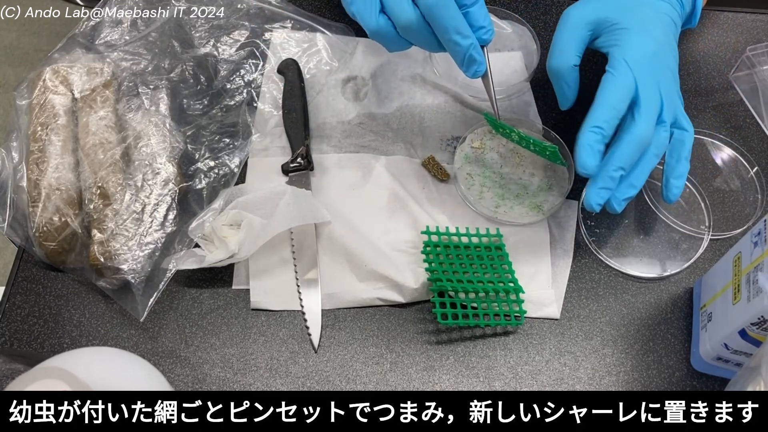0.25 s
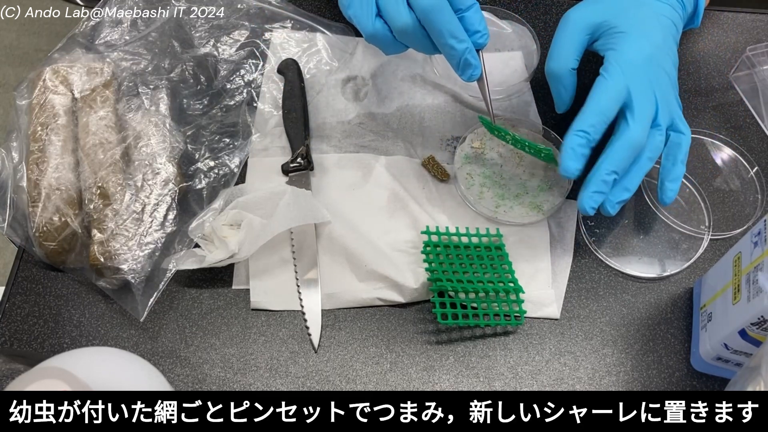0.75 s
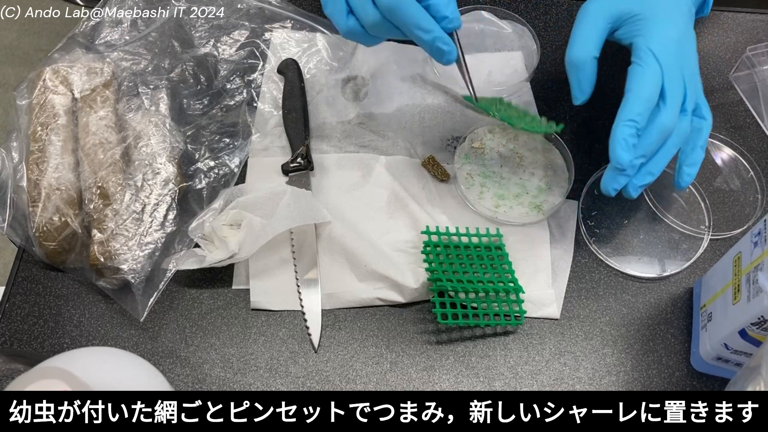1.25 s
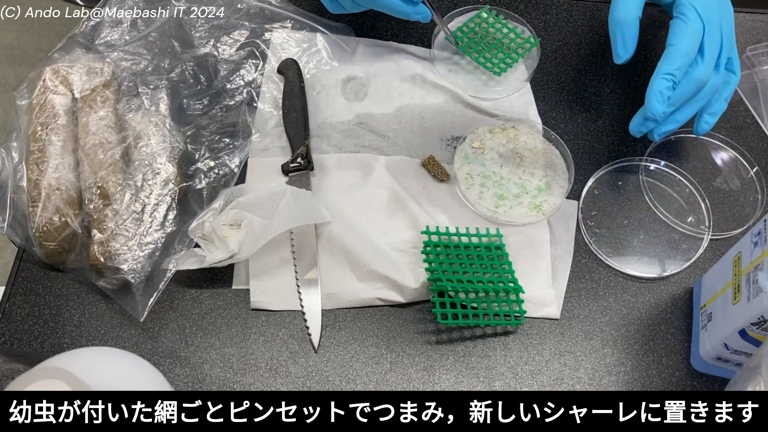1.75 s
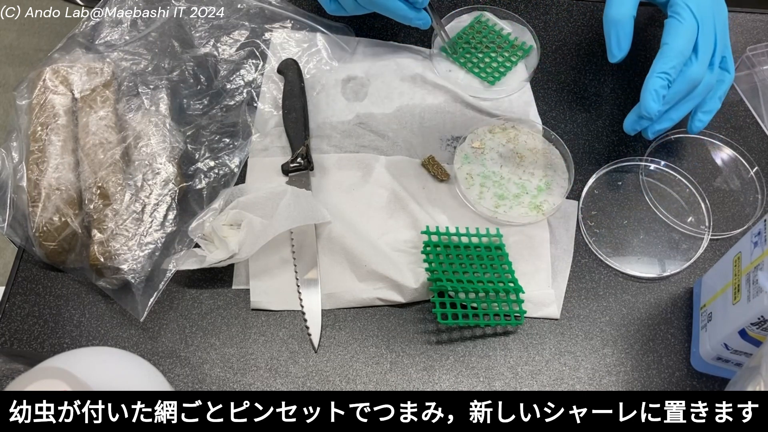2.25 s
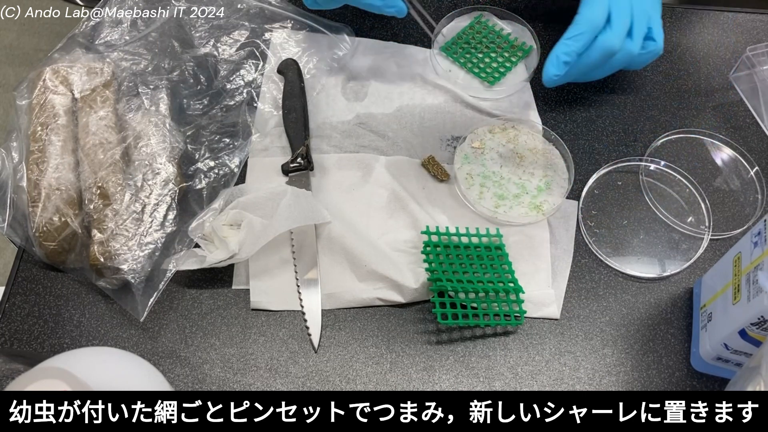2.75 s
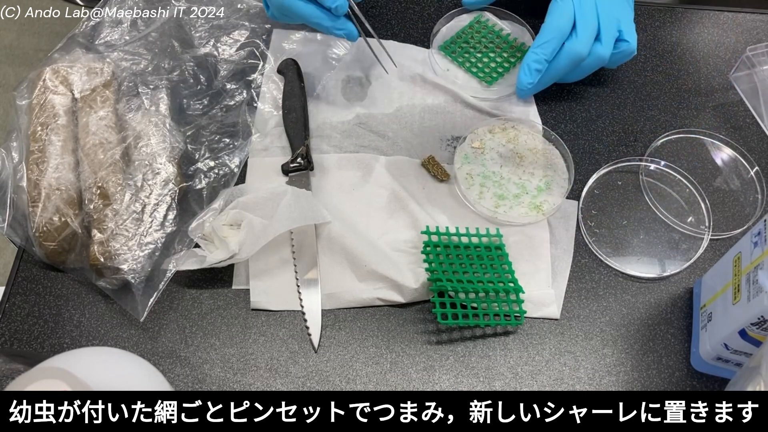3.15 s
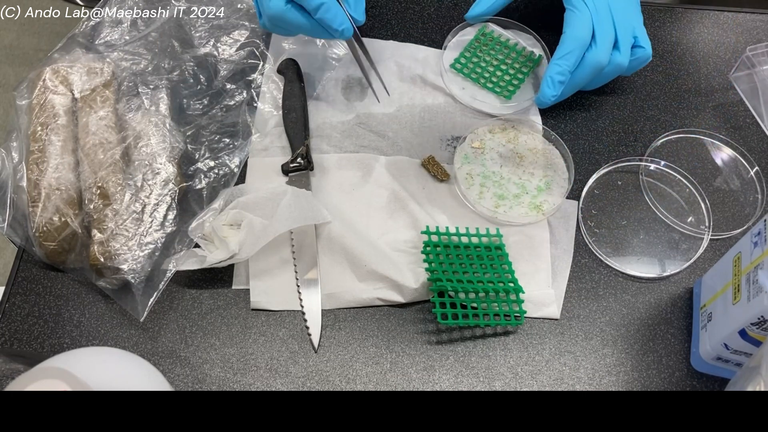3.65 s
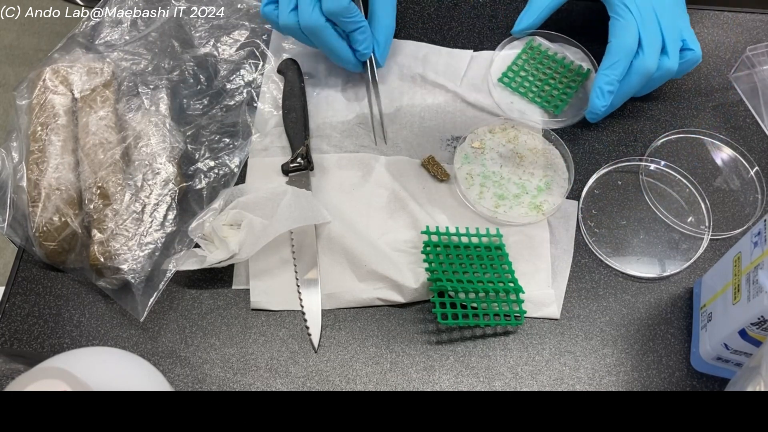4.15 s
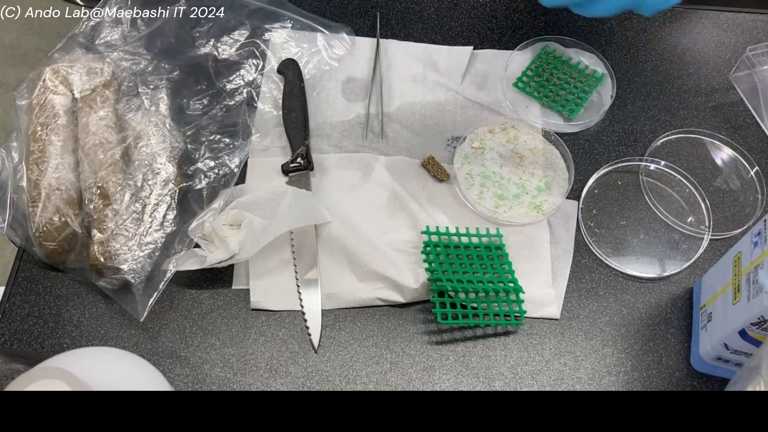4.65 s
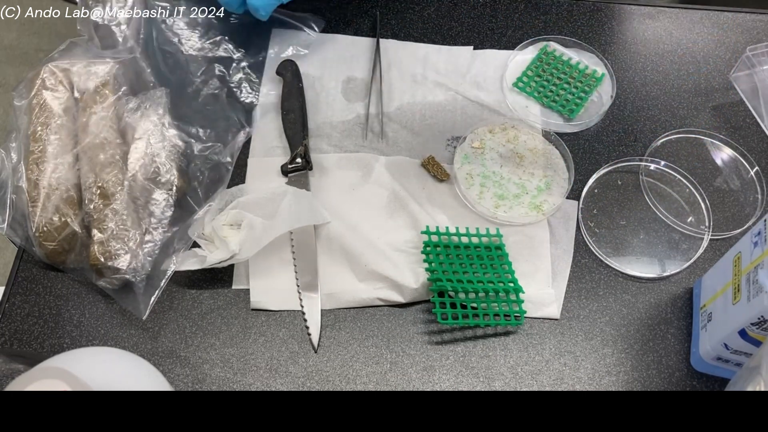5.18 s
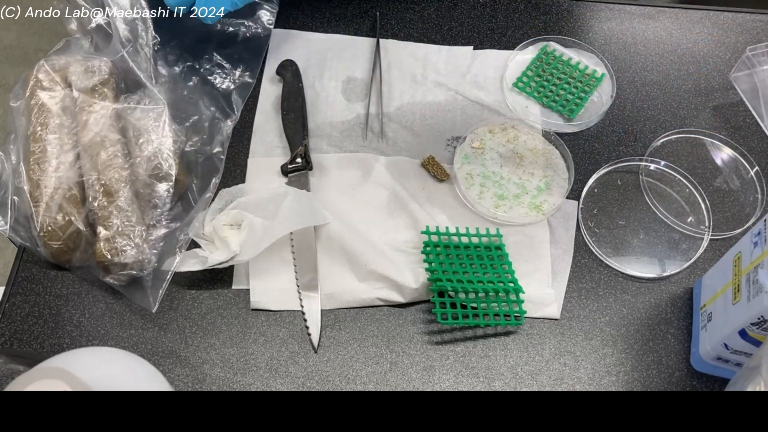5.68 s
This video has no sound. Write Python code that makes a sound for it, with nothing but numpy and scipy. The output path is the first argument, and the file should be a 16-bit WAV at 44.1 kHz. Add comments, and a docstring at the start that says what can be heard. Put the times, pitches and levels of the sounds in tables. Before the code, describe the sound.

Laboratory fans hum low and steady with soft airy hiss throughout. After a long quiet stretch a plastic dish scrapes faintly, steel tweezers hit the bench with one bright, hard clack, and then a gloved hand crumples a plastic bag in crackly bursts. Close stereo microphone above the bench, short room reflections.

```python
"""A laboratory bench under steady ventilation, heard by a small stereo microphone close above it.
A dish scrapes softly, steel tweezers are put down with a sharp clack, then a gloved hand takes hold of a
plastic bag. Noise bursts make the blow, with fading tones for bench and prongs; grains of noise make scrape
and rustle, and short bursts with late clicks make plastic snaps, a few of them before the hand takes hold.
Fans hum as wavering tones over filtered noise for air."""
import sys
import numpy as np
from scipy import signal
from scipy.fft import rfft, irfft
from scipy.io import wavfile

SR = 44100
rng = np.random.default_rng(int(sys.argv[2]) if len(sys.argv) > 2 else 0)


def transcribe(u):
    """Save the signal u as a 16-bit wav file named by the first command-line argument.

    u: samples, shape (n,) or (channels, n), limited to [-1, 1]; the rate is SR.
    q: integer samples, one column per channel.
    """
    v = np.clip(np.atleast_2d(u).T, -1, 1)
    q = np.round(v * 32767).astype(np.int16)
    wavfile.write(sys.argv[1], SR, q)


N = 261072
T = np.arange(N) / SR  # time of every sample [s]
FREQ = np.maximum(np.arange(N // 2 + 1) * SR / N, 1)  # frequency of every spectrum bin [Hz]
SIDES = np.array([[1], [-1]])  # left, right

# colour of creased plastic, in snaps and scrapes: (frequency [Hz], relative level [dB])
CREASE_COLOUR = [(300, 7), (1400, 11), (3000, 3), (5500, 4), (8500, 2.5), (12000, 1.5), (16000, -8)]


def undb(db):
    """Turn decibels into gain."""
    return 10 ** (np.asarray(db) / 20)


def unit(x):
    """Scale to an rms of 1."""
    return x / np.sqrt(np.mean(x ** 2))


def curve_db(points):
    """Join (Hz, dB) points by straight lines over log frequency."""
    hz, db = np.transpose(points)
    return np.interp(np.log(FREQ), np.log(hz), db)


def colour(x, points):
    """Filter by a spectrum, keeping the power of white noise."""
    gain = unit(undb(curve_db(points)))
    return irfft(rfft(x) * gain, N)


def fade(t60):
    """Half a second of exponential decay that loses 60 dB in t60 seconds."""
    return np.exp(-np.log(1000) * np.arange(SR // 2) / SR / t60)


def add(out, s, sound):
    """Mix a sound in at time s."""
    start = int(s * SR)
    out[:, start:start + sound.shape[1]] += sound[:, :N - start]


def walk(hz):
    """Slow complex random wandering of rms 1, about hz wide."""
    spectrum = np.fft.fft(rng.standard_normal(N))[:N // 2 + 1]
    z = np.fft.ifft(spectrum * np.exp(-(FREQ / hz) ** 2), N)
    return z / np.sqrt(np.mean(abs(z) ** 2))


def dull(x, hz):
    """Soften a contact: it loses what lies above hz."""
    return signal.sosfilt(signal.butter(2, hz, fs=SR, output="sos"), x)


def resonate(x, hz, q):
    """Pick out a broad resonance with gain 1 at its centre."""
    return signal.lfilter(*signal.iirpeak(hz, q, fs=SR), x)


def room(x, wet_db, t60):
    """Add dense reflections from bench and walls, different on each side."""
    tail = rng.standard_normal((2, SR // 2)) * fade(t60)
    tail[:, :SR // 500] = 0  # no reflection in the first 2 ms
    tail /= np.sqrt(np.sum(tail ** 2, axis=1, keepdims=True))
    return x + undb(wet_db) * signal.fftconvolve(x, tail, axes=1)[:, :N]


def ring(modes):
    """Sum dying tones, each reaching the two sides with its own phase and balance."""
    rise_s = .0004  # a contact takes this long to set a tone going
    t = T[:SR // 2]
    total = 0
    for hz, db, t60, pan_db in modes:
        level = undb(db + SIDES * pan_db / 2)
        start_turns = rng.random((2, 1))
        total = total + level * fade(t60) * np.sin(2 * np.pi * (hz * t + start_turns))
    return np.minimum(t / rise_s, 1) * total


def tweezers(knock_t60=0.023, tick_t60=0.0033, room_t60=.13):
    """Close contacts tick, knock and ring bench and prongs; a soft late swell of the steel ring follows."""
    # contacts and the late swell: (time [s], knock level [dB], knock and steel ring dull above [Hz],
    # bench ring level [dB], steel ring level [dB], tick level [dB])
    contacts = [(4.3195, -40, 3200, -58, -85, -85), (4.3755, -20.5, 16000, -52, -36.5, -15.5),
                (4.3768, -20, 7000, -30.5, -60, -30), (4.3797, -22.5, 5000, -56, -66, -36),
                (4.3823, -23, 4000, -54, -64, -43), (4.3905, -35, 5000, -52, -44, -62),
                (4.4290, -70, 4500, -80, -39, -85)]
    # tones of bench top and dishes: (frequency [Hz], level [dB], t60 [s], left minus right [dB])
    bench_modes = [(320, -9, .08, 0), (690, -14, .07, 0), (795, -3, .055, 11), (1000, 1, .06, -11),
                   (1075, -3, .06, -1), (1390, -3, .035, -2), (1540, 4.5, .035, 7), (1625, 4, .055, 2),
                   (1750, 0, .075, 4), (1890, 3, .04, 5), (1985, 1, .04, 12), (2110, 1, .06, 1),
                   (2215, 3.5, .04, 10), (2340, 2, .05, 0), (2640, 1, .055, 0), (2900, -1, .065, -2),
                   (3200, 6.5, .024, 8), (3410, 1.5, .04, -4), (3560, -.5, .04, 5), (3765, -5, .07, 0),
                   (4151, 3.5, .105, 0), (4275, -4, .09, -4), (4830, -5, .055, -5)]
    # tones of the steel prongs: (frequency [Hz], level [dB], t60 [s], left minus right [dB])
    steel_modes = [(7978, -2.5, .13, 0), (8030, -1, .08, 0), (10100, -9, .05, 0), (12970, -20, .07, 0),
                   (14040, -5.5, .1, 0)]
    # the bench top gives under the blow; both sides hear the left version:
    # (frequency [Hz], level relative to the knock [dB], t60 [s], left minus right [dB])
    thud_modes = [(165, -13, 0.094, 3), (232, -27, 0.013, -5)]
    # colour of the knock: (frequency [Hz], relative level [dB])
    knock_colour = [(100, -17), (450, -5), (700, -6), (1250, -5), (1700, 3), (2300, 3.5), (2600, -4),
                    (3300, 4), (4500, -0.5), (5500, -2), (7000, -6), (11000, -10), (16000, -30)]
    # colour of the contact tick: (frequency [Hz], relative level [dB])
    tick_colour = [(500, -26), (3000, -12), (6000, 12), (8700, -14), (10500, 8.5), (12500, 3), (16000, -7)]

    knock, tick, bench, prongs_and_thud = np.zeros((4, 2, N))
    bench_ring, steel_ring = ring(bench_modes), ring(steel_modes)
    for s, knock_db, soft_hz, bench_db, steel_db, tick_db in contacts:
        noise = rng.standard_normal((2, 2, SR // 2))
        add(knock, s, undb(knock_db) * dull(noise[0] * fade(knock_t60), soft_hz))
        add(tick, s, undb(tick_db) * noise[1] * fade(tick_t60))
        add(bench, s, undb(bench_db) * bench_ring)
        add(prongs_and_thud, s, undb(steel_db) * dull(steel_ring, soft_hz))
    # the contact with the highest knock level also thuds
    hardest_s, hardest_db = max(contacts, key=lambda contact: contact[1])[:2]
    add(prongs_and_thud, hardest_s, undb(hardest_db) * ring(thud_modes)[:1])

    knock = room(colour(knock, knock_colour), wet_db=-5.5, t60=room_t60)
    bench = room(bench, wet_db=-12.5, t60=room_t60)
    tick = room(colour(tick, tick_colour), wet_db=-26, t60=0.088)
    return knock + bench + tick + prongs_and_thud


def snaps(gain_db=0.5, t60=0.0015, settle_db=-9, settle_t60=0.023, facet_db=2.0, facet_q=4):
    """A crease cracks sharply, then settles in tiny clicks; its largest facet colours the snap."""
    # plastic snaps and ticks: (time [s], level [dB], body below 5 kHz relative to the treble [dB],
    # pitch of the largest facet [Hz])
    snap_list = [(1.549, -42, -5, 10400), (2.2933, -57, -3, 10400), (3.81, -52, -5, 10300),
                 (5.083, -50, 10, 2800), (5.1007, -29.5, 0.5, 3870), (5.131, -45, 2, 10500),
                 (5.162, -36, -2.5, 4060), (5.1773, -34, -13, 8750), (5.2, -37.5, 7, 7000),
                 (5.245, -44.5, 9.5, 5800), (5.317, -54, 11, 3200), (5.348, -38.5, 4.5, 7850),
                 (5.369, -57, 13, 3000), (5.398, -45, 1, 7000), (5.534, -44.5, 3.5, 4440),
                 (5.5735, -34.5, 1, 11900), (5.596, -57, 16, 2700), (5.626, -58, 12, 3200),
                 (5.646, -39.5, 3, 6300), (5.688, -39, -8, 3000), (5.698, -38, -10, 10500),
                 (5.705, -57, -9, 12000), (5.737, -39, 0, 3700), (5.745, -35.5, 1.5, 3000),
                 (5.7605, -35, 2, 7000), (5.775, -46, 3, 7000), (5.83, -38, -9, 10800),
                 (5.8549, -29, -5, 3800), (5.859, -35, -18, 5160)]
    clicks_per_s = 3000  # before they fade away
    click_chance = clicks_per_s / SR

    crack, body = np.zeros((2, 2, N))
    for s, db, body_db, facet_hz in snap_list:
        noise = rng.standard_normal((2, 2, SR // 2))
        clicks = (rng.random(SR // 2) < click_chance) * noise[1] / np.sqrt(click_chance)
        burst = noise[0] * fade(t60) + undb(settle_db) * clicks * fade(settle_t60)
        burst = burst + undb(facet_db) * resonate(burst, facet_hz, facet_q)
        burst = undb(db + gain_db) * burst
        add(crack, s, burst)
        add(body, s, burst * undb(body_db))
    low = 1 / (1 + (FREQ / 5000) ** 4)  # share of the body; the rest is treble
    return colour(irfft(rfft(crack) * (1 - low) + rfft(body) * low, N), CREASE_COLOUR)


def rustle(press, spectrum, per_second, spread_db):
    """Many tiny slips of uneven size, as loud as the hand presses."""
    sizes = undb(spread_db * np.minimum(rng.exponential(size=N), 4))
    grains = (rng.random(N) < per_second / SR) * sizes * rng.standard_normal((2, N))
    return colour(unit(grains) * press, spectrum)


def effort(moves, attack_s=0.01, release_t60=0.17):
    """How hard the hand works: each move builds up, holds and dies away."""
    total = 0
    for s, length, db in moves:
        attack = np.clip((T - s) / attack_s, 0, 1)
        release = np.exp(-np.log(1000) * np.maximum(T - s - length, 0) / release_t60)
        total = total + undb(db) * attack * release
    return total


def bag(catch_db=2, resting_db=-10.5, film_db=-60, pouch_db=-58, crackle_db=-61):
    """One effort crumples the film, flexes the whole bag and pops small creases; the film slips unevenly."""
    # the hand takes hold, shifts, pulls and tugs once more: (start [s], length [s], effort [dB])
    grips = [(5.07, 0.14, 1.5), (5.33, 0.067, -12), (5.55, 0.25, -2), (5.822, 0.053, -3)]
    # colour of the rustling film: (frequency [Hz], relative level [dB])
    film_colour = [(200, -19), (1500, 1), (3000, 7), (5000, 0), (8500, 5), (12000, 2), (16000, -12)]
    # colour of the flexing bag: (frequency [Hz], relative level [dB])
    pouch_colour = [(200, -20), (700, -5), (1550, 6), (3000, -4), (5000, -5), (10000, -25)]
    # colour of small creases between the big snaps: (frequency [Hz], relative level [dB])
    crackle_colour = [(300, -17), (900, 19), (1600, -12), (3000, 11), (5000, 2), (8000, -11), (16000, -18)]

    # from the first touch on, the hand stays on the bag between grips
    resting = undb(resting_db) * (T > grips[0][0])
    catching = undb(catch_db * walk(25).real)
    press = np.maximum(effort(grips), resting) * catching
    film = rustle(press, film_colour, per_second=1600, spread_db=1.5)
    pouch = rustle(press, pouch_colour, per_second=1200, spread_db=1.0)
    creases = rustle(press, crackle_colour, per_second=160, spread_db=1.5)
    return undb(film_db) * film + undb(pouch_db) * pouch + undb(crackle_db) * creases


def dish():
    """A plastic dish slides a little under the fingers; dense tiny slips make a soft scrape."""
    # slides over the bench: (start [s], length [s], level [dB])
    slides = [(3.73, 0.12, -71)]
    return rustle(effort(slides), CREASE_COLOUR, per_second=6000, spread_db=1.5)


def fans():
    """Blade and motor tones, each wavering as the air load changes."""
    # blade tone of the main fan, nearly steady:
    # (frequency [Hz], rms level [dB], waver [0-1], phase between the sides [rad])
    blade_tone = [(309.5, -45.6, .1, .2)]
    # further fan and motor tones:
    # (frequency [Hz], rms level [dB], waver [0-1], phase between the sides [rad])
    hum_tones = [(48.3, -66.5, 0.2, 0.12), (99.95, -52, 0.2, 0.18), (111.2, -54, 0.43, .1),
                 (201.3, -57, 0.54, 0.79), (291.6, -60.5, .3, 0.37), (403, -73, 0.17, 0.37),
                 (415, -85.5, 0.5, .4), (494, -77, .6, 2), (583, -75, 0.2, 1.4), (593.4, -70.5, 0.36, 1.6),
                 (597, -68, 0.46, 1.3), (604, -68, 0.6, 1.16), (611.5, -72.5, 0, 1.8),
                 (635, -69.5, 0.25, 1.6), (633, -69.5, 0.36, 1.5), (716, -78, 0.5, 1.8),
                 (746.5, -72, 0.7, 0.66)]

    out = np.zeros((2, N))
    knots = np.arange(0, T[-1] + 1, .27)  # a new random waver every 0.27 s
    # between knots each tone drifts in level and phase, so close neighbours beat unevenly
    for hz, db, waver, phase in blade_tone + hum_tones:
        draw = rng.standard_normal((2, len(knots)))
        sway = 1 + waver * np.interp(T, knots, draw[0] + 1j * draw[1])
        sway = sway / np.sqrt(np.mean(abs(sway) ** 2) / 2)
        tone = sway * np.exp(2j * np.pi * (hz * T + rng.random()))
        out += undb(db) * (tone * np.exp(.5j * phase * SIDES)).real
    return out


def air():
    """Turbulent air coloured by duct resonances; the rumble flutters while the hiss stays even."""
    # noise common to both sides, before the resonances: (frequency [Hz], level [dB per Hz])
    common_air = [(20, -105), (36, -83), (52, -69), (110, -72), (135, -71.5), (300, -73.5), (400, -78.5),
                  (480, -91), (1200, -96), (2700, -95.5), (3600, -103), (5300, -104), (5800, -108),
                  (12500, -120), (16000, -131)]
    # noise opposed between the sides, before the resonances: (frequency [Hz], level [dB per Hz])
    opposed_air = [(20, -110), (60, -89.5), (140, -83.5), (220, -79.5), (400, -83.5), (750, -84.5),
                   (1000, -93.5), (1600, -91.5), (2500, -101), (5200, -103), (6600, -112), (9300, -112),
                   (12500, -116), (16000, -133)]
    # resonances of ducts and room: (frequency [Hz], width [Hz], common lift [dB], opposed lift [dB])
    duct_modes = [(75, 14, 4, 9.5), (116.5, 5.4, 11, 6), (152.4, 8.5, 7.5, -8), (167.5, 8.6, 10.5, -4),
                  (304, 16.7, 7.5, 0), (610, 64, 6.5, 1.5), (710, 223, 5, -4.5), (1474, 44, 9.5, -13),
                  (1640, 150, 3, 4.5), (1773, 35, -7, 10), (2028, 130, 5, 2.5), (2326, 40, 8.5, 3),
                  (2746, 290, 4, 4), (4720, 700, 3, 0), (5336, 32, 13, 4)]

    mid_db, side_db = curve_db(common_air), curve_db(opposed_air)
    for hz, width, common_db, opposed_db in duct_modes:
        bump = np.exp(-np.log(2) * (2 * (FREQ - hz) / width) ** 2)
        mid_db = mid_db + common_db * bump
        side_db = side_db + opposed_db * bump
    mid, side = rfft(rng.standard_normal((2, N))) * np.sqrt(SR / 2)
    both = mid * undb(mid_db) + SIDES * side * undb(side_db)
    low = 1 / (1 + (FREQ / 500) ** 4)  # share of the rumble; the rest is hiss
    flutter = undb(0.34 * walk(5.9).real)
    return irfft(both * low, N) * flutter + irfft(both * (1 - low), N)


def scene():
    """Bench work in front of ventilation that runs throughout."""
    plastic = room(snaps() + bag() + dish(), wet_db=-4.5, t60=0.045)
    return tweezers() + plastic + fans() + air()


def record(dry):
    """In the treble the left side is mostly the right one, inverted and slightly late; the top is cut."""
    lag_s, top_hz = .000221, 16150
    left, right = rfft(dry)
    shared = .96 / (1 + (6400 / FREQ) ** 16)  # grows from nothing to 0.96 around 6.4 kHz
    late_right = right * np.exp(-2j * np.pi * FREQ * lag_s)
    left = np.sqrt(1 - shared ** 2) * left - shared * late_right
    top_cut = signal.ellip(8, .2, 70, top_hz, fs=SR, output="sos")
    return signal.sosfilt(top_cut, irfft(np.array([left, right]), N))


dry = scene()
out = record(dry)
transcribe(out)
```